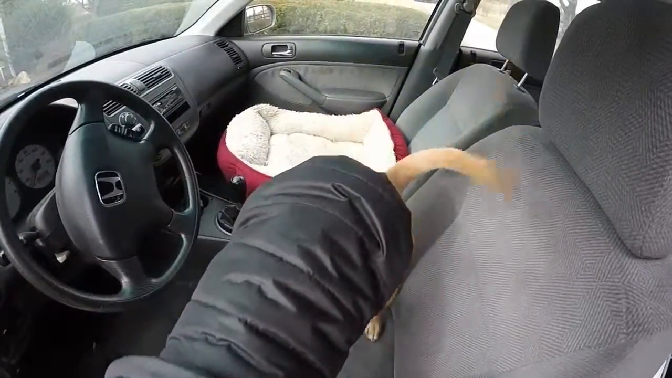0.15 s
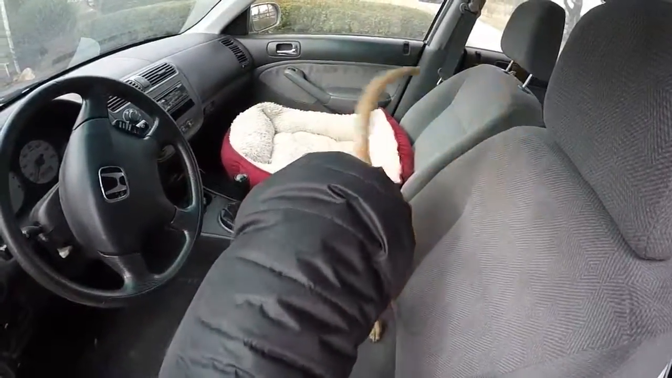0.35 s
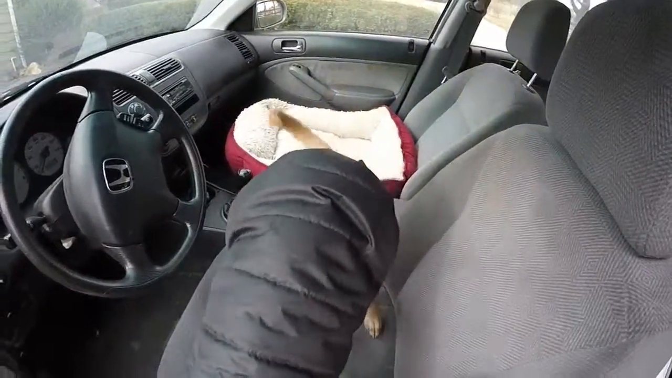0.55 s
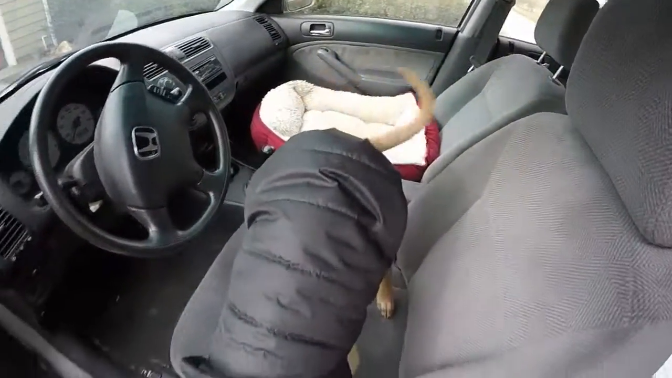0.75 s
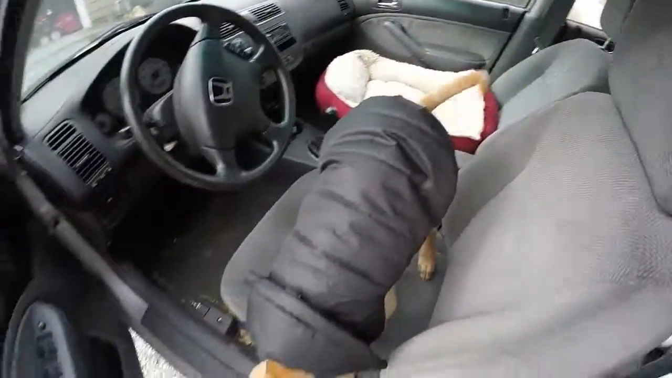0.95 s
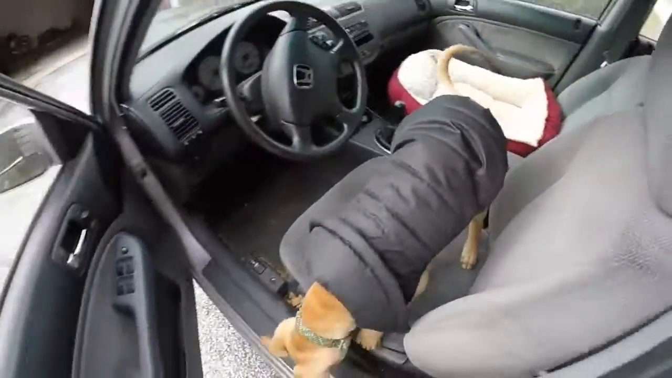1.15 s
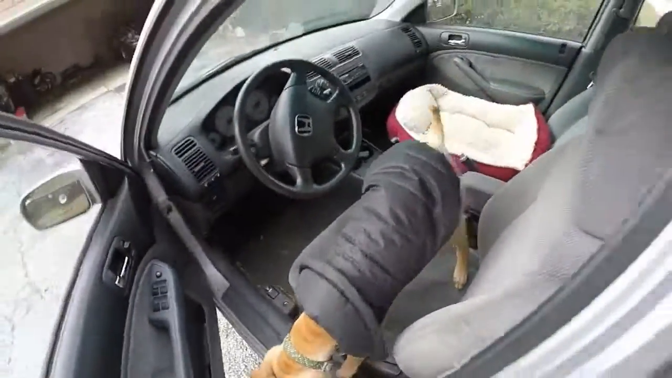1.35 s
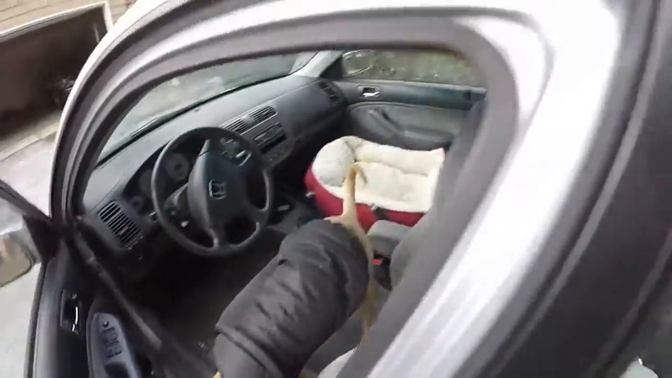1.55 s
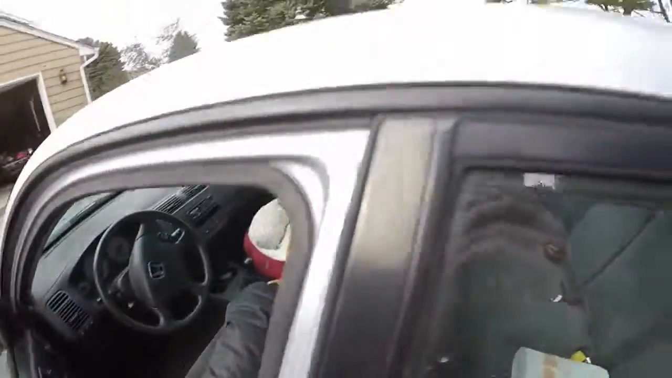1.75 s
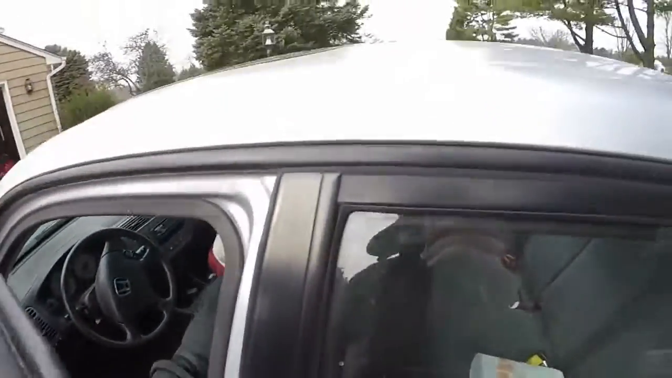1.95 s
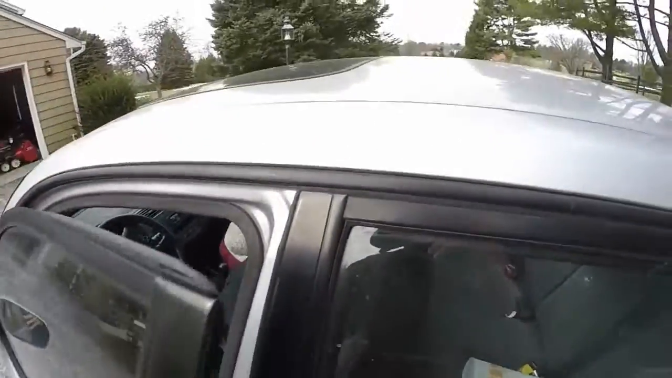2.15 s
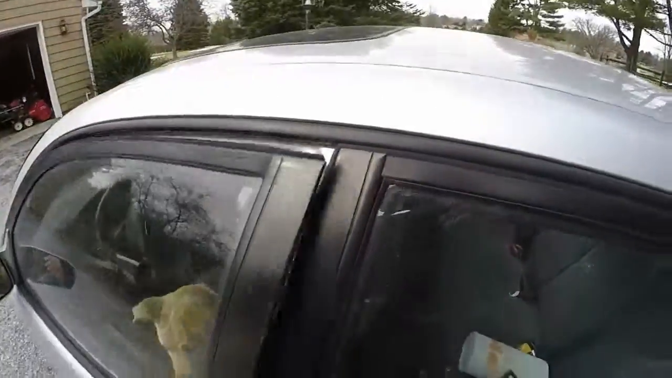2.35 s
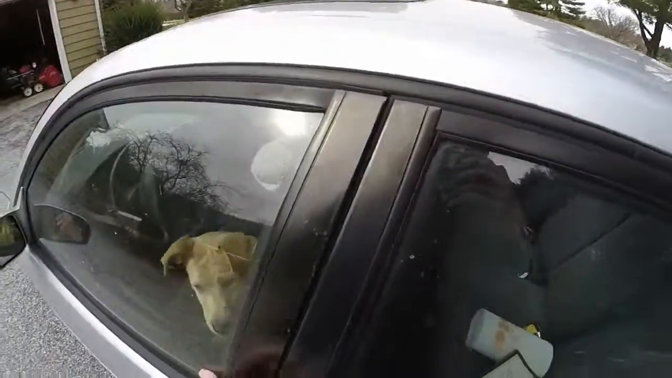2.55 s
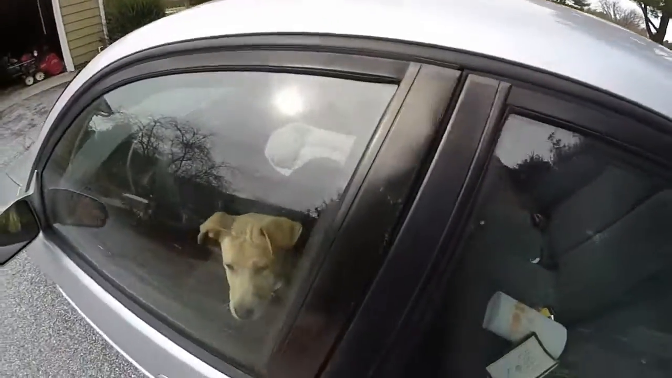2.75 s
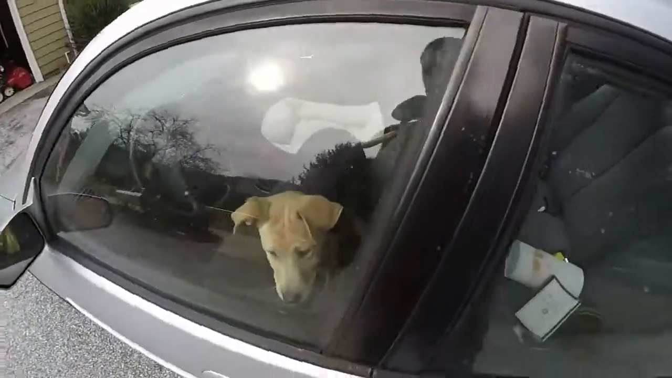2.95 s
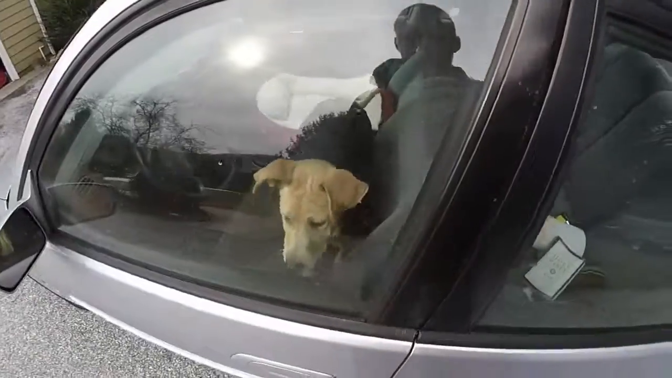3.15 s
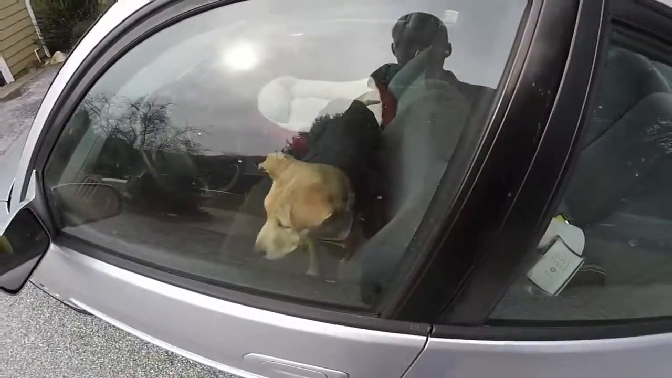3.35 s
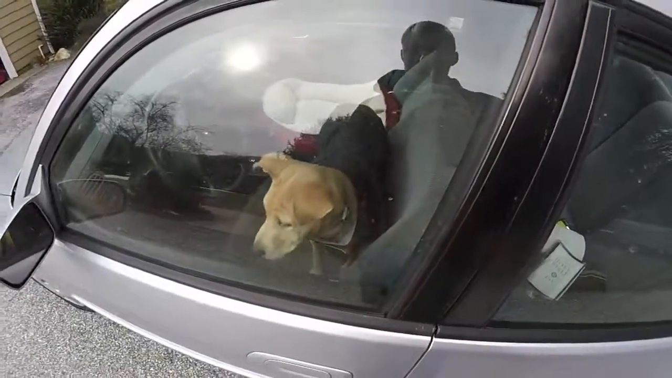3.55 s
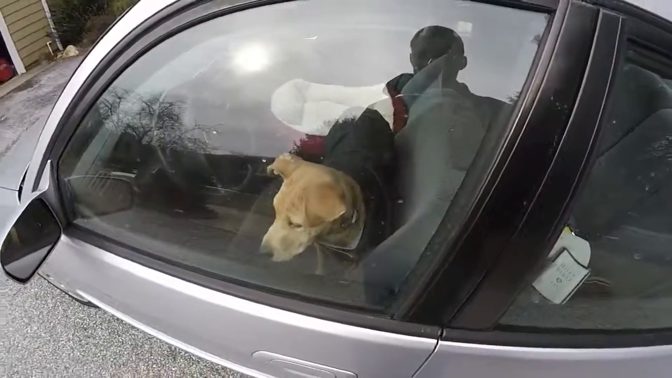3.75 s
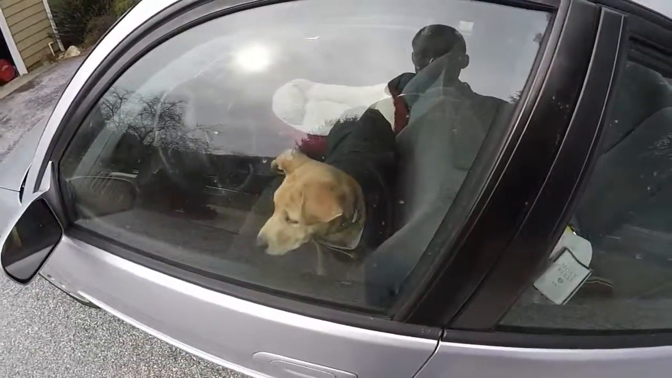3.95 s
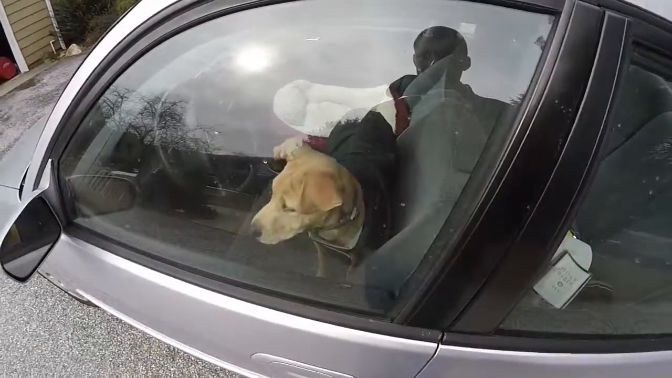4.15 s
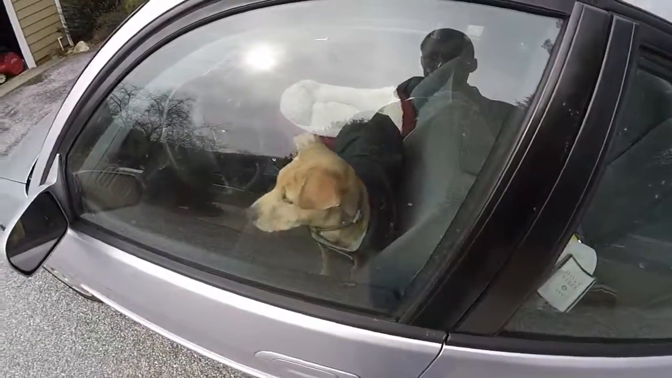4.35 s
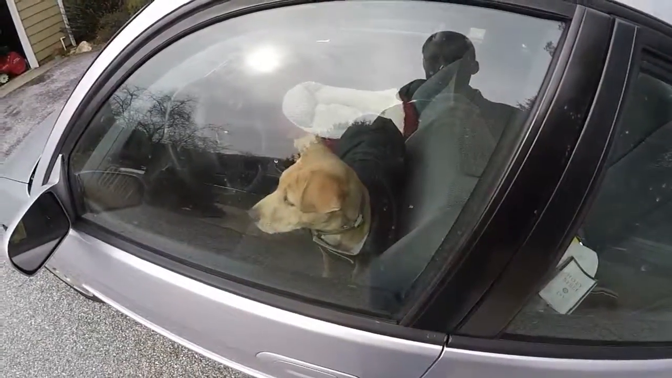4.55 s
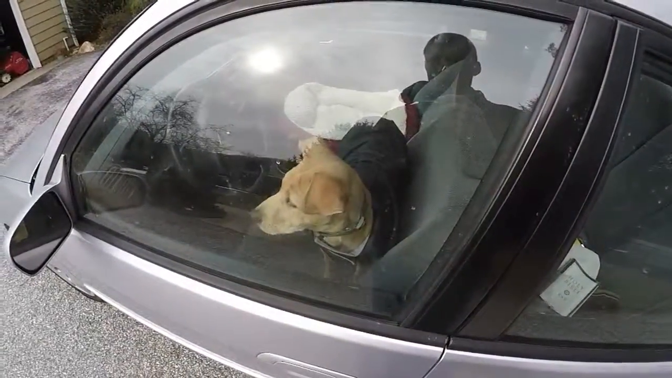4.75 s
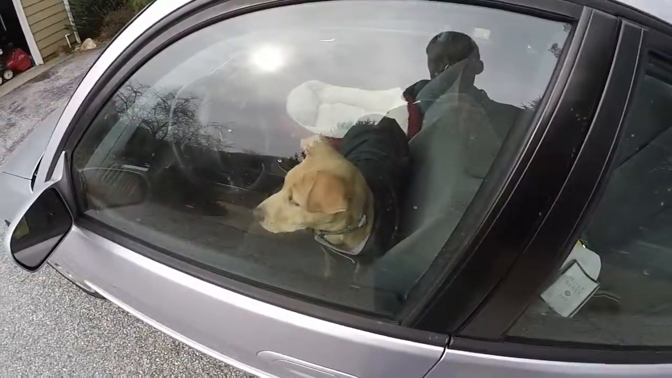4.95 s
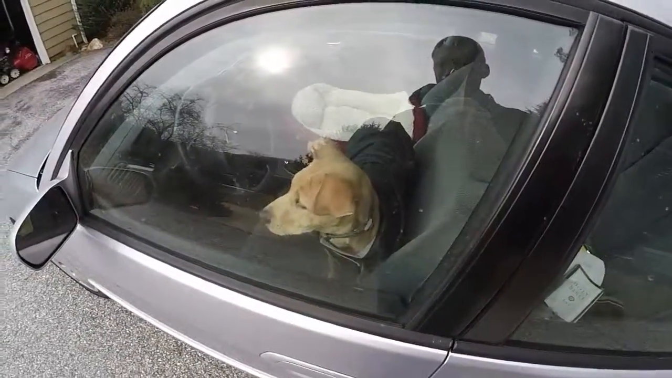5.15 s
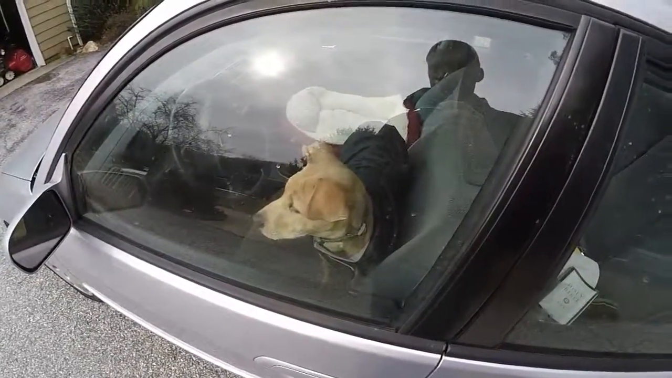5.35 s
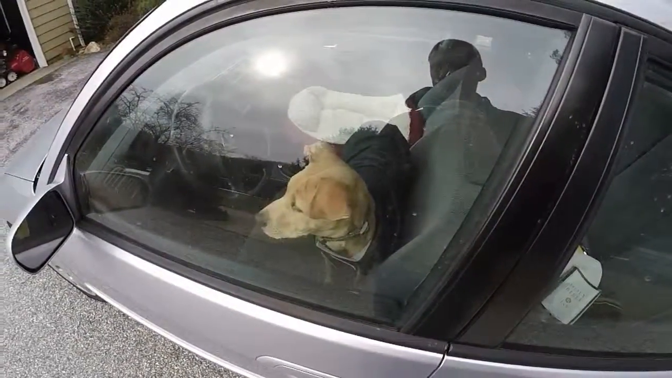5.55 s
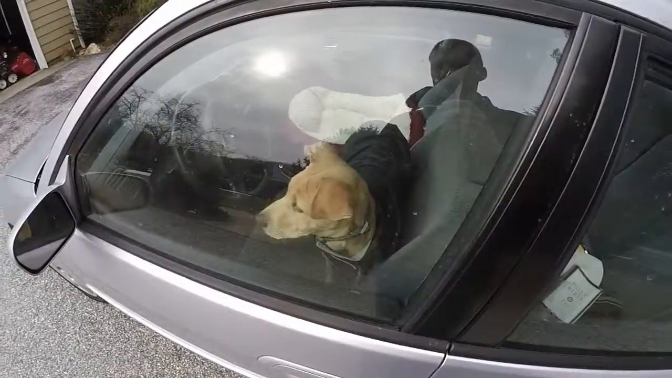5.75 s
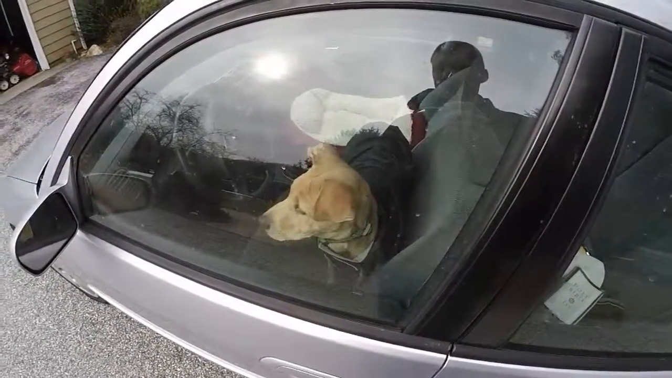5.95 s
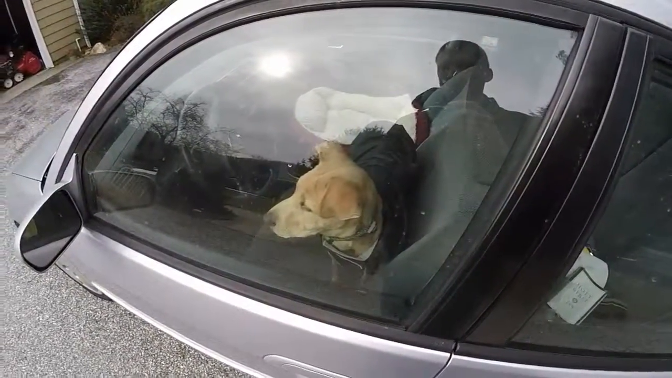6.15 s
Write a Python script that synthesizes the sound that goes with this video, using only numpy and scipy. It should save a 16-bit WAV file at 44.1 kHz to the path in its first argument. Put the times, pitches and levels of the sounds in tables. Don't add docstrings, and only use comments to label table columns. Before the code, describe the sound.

Soft scuffs, dull thuds and sharp plastic ticks come in uneven clusters from inside a parked car, over a faint low hum. The outside bass opens up as the microphone leaves the cabin. A faint squeaking hinge leads to one loud, heavy door thunk with rattling panel. A few small clicks and a knock follow, then a quiet driveway with far traffic and sparse high chirps.

```python
import sys
import numpy as np
from scipy import signal
from scipy.fft import rfft, irfft, next_fast_len
from scipy.io import wavfile
from scipy.ndimage import uniform_filter1d, map_coordinates

SR = 44100
rng = np.random.default_rng(int(sys.argv[2]) if len(sys.argv) > 2 else 0)


def rack_gain(trim_db):
    fader = np.asarray(trim_db, float)
    return 10 ** (fader / 20)


def master_out(mix):
    frames = np.transpose(np.atleast_2d(mix))
    ceiling = np.clip(frames, -1, 1)
    pcm = np.round(ceiling * 32767).astype(np.int16)
    wavfile.write(sys.argv[1], SR, pcm)


N = 273905


def unit(x):
    return x / np.sqrt(np.mean(x ** 2) + 1e-20)


def along(points, hz):
    f, v = np.transpose(points)
    return np.interp(np.log(hz + 1), np.log(f + 1), v)


def curves(rows):
    s, *columns = np.transpose(rows)
    return [np.interp(np.arange(N) / SR, s, column) for column in columns]


def wobble(rate, size=N):
    knots = rng.standard_normal(int(size * rate / SR) + 4)
    return map_coordinates(knots, [np.arange(size) * rate / SR])


def filtered(x, response):
    m = next_fast_len(len(x) + 8192)
    return irfft(rfft(x, m) * response(np.fft.rfftfreq(m, 1 / SR)), m)[:len(x)]


def peak(f, hz, width_hz):
    return 1j * f * width_hz / (hz * hz - f * f + 1j * f * width_hz + 1e-9)


def modes(table):
    return lambda f: sum((-1) ** k * rack_gain(db) * peak(f, hz, w) for k, (hz, w, db) in enumerate(table))


def noise_band(size, hz, width_hz, order=2):
    return unit(filtered(rng.standard_normal(size), lambda f: peak(f, hz, width_hz) ** order))


def coloured(spectrum, grain_db=0.0):
    fibres = rack_gain(grain_db * wobble(700) + .5 * grain_db * wobble(60))
    return unit(filtered(fibres * rng.standard_normal(N), lambda f: rack_gain(along(spectrum, f))))


def patchy(x, patch_db):
    z = signal.stft(x, nperseg=256)[2]
    field = uniform_filter1d(rng.standard_normal(z.shape), size=7, axis=0)
    field = uniform_filter1d(field, size=9, axis=1)
    return unit(signal.istft(z * rack_gain(patch_db * unit(field)), nperseg=256)[1][:N])


def swells(rows, rise_s, fall_s, slower=0.0):
    t = np.arange(0, N / SR, .001)
    start, hold, db = (column[:, None] for column in np.transpose(rows))
    lost = np.maximum(start - t, 0) / (rise_s + slower * hold)
    lost = lost + np.maximum(t - start - hold, 0) / (fall_s + slower * hold)
    return np.interp(np.arange(N) / SR, t, np.sqrt((rack_gain(db - 10 * lost) ** 2).sum(axis=0)))


def dying(t, t60, attack):
    return rack_gain(-60 * t / t60) * (1 - np.exp(-t / attack))


def add(track, s, sound):
    start = round(s * SR)
    track[start:start + len(sound)] += sound[:N - start]


def whistle(rows, partials, rough_db):
    s, hz, db = np.transpose(rows)
    t = np.arange(s[0], s[-1], 1 / SR)
    pitch = np.interp(t, s, hz) * (1 + 0.0033 * wobble(188.0, size=len(t)))
    turn = 2 * np.pi * np.cumsum(pitch) / SR
    edge = np.clip(np.minimum(t - s[0], s[-1] - t) / 0.0018, 0, 1)
    level = rack_gain(np.interp(t, s, db) + rough_db * wobble(147.0, size=len(t)))
    passed = (t - s[0]) / (s[-1] - s[0])
    tone = sum(rack_gain(g + fade * passed) * np.sin(k * turn) for k, g, fade in partials)
    return np.sqrt(2) * edge * level * tone


# frequency in Hz, level in dB per Hz.
TRAFFIC = [(32, -48), (55, 1), (123, -2.5), (145, -6.5), (232, -9.5), (267, -22.5), (323, -25.5),
           (409, -17.5), (556, -21.5), (792, -17.5), (1940, -28), (3340, -28), (6780, -35), (7460, -36.5),
           (15500, -42.5)]
# frequency in Hz, width in Hz, level in dB.
HUM = [
    (121, 7.1, -51),
    (237.5, 28, -61),
    (89, 10, -64.5),
    (2677, 98, -72.5),
    (4500, 840, -71),
]
# start in seconds, hold in seconds, level in dB.
GUSTS = [(.2, 0.49, -49), (1.13, 0.018, -41.5), (1.33, 0.028, -38), (1.62, 0.57, -48.5), (2.6, .06, -45),
         (2.8, 0.065, -43), (2.95, 0.37, -48), (4.25, 0.18, -56), (5.12, 0.055, -55), (5.6, 0.047, -50),
         (6.15, .1, -60)]


def outdoors():
    wash = rack_gain(-44.5 - 1.5 + 0.23 * wobble(3.46)) * coloured(TRAFFIC)
    hum = sum(rack_gain(db) * noise_band(N, hz, width_hz) for hz, width_hz, db in HUM)
    shelter_db, = curves([(1, -4.5), (1.2, 0.7)])
    bass = filtered(wash + hum, lambda f: 1 / (1 + (f / 1200) ** 2))
    buffet = coloured([(8, -120), (18, -3), (35, 16.5), (55, 6.5), (90, -7), (150, -120)])
    still_air = rack_gain(-52)
    puffs = np.hypot(still_air, swells(GUSTS, rise_s=0.11, fall_s=0.055))
    return wash + hum + (rack_gain(shelter_db) - 1) * bass + puffs * buffet


# time from the start in seconds, frequency in Hz, level in dB.
SEEP = [(0, 6300, -12), (.011, 7400, 0), (.02, 7380, 1), (.09, 7200, -16), (.17, 7250, -24)]
CHIP = [(0, 8140, -12), (.012, 7600, 1.5), (.027, 7250, -7)]
RISE = [(0, 2480, -9), (.006, 2630, -2), (.013, 2770, -2), (.018, 2940, -13), (.023, 3230, -2),
        (.031, 3350, -1), (.041, 3150, -6)]
COO = [(0, 1300, -5), (.025, 1230, 0), (.038, 1440, -3), (.05, 1630, 1), (.075, 1540, -4), (.125, 1420, -6)]
# share of its length, share of its top pitch, level in dB.
ARCH = [(0, .8, -2), (.3, .93, 1.5), (.57, 1, 2.5), (1, .86, -6)]
# start in seconds, level in dB.
SEEPS = [
    (3.752, -49.5),
]
CHIPS = [
    (3.951, -52),
    (4.982, -53.5),
]
RISES = [
    (5.27, -60),
    (5.553, -57.5),
    (5.981, -55),
]
COOS = [
    (4.513, -60),
    (4.922, -60),
]
# start in seconds, length in seconds, top frequency in Hz, level in dB.
ARCHES = [
    (4.729, .046, 4110, -60),
]


def birds():
    out = np.zeros(N)
    calls = [(SEEP, SEEPS), (CHIP, CHIPS), (RISE, RISES), (COO, COOS)]
    notes = [[(s + late, hz, db + g) for late, hz, g in shape] for shape, rows in calls for s, db in rows]
    notes += [[(s + u * length, k * hz, db + g) for u, k, g in ARCH] for s, length, hz, db in ARCHES]
    for note in notes:
        add(out, note[0][0], whistle(note, [(0.99, 0, 0)], rough_db=1.8))
    return out


# time in seconds, level in dB.
SHUFFLE = [(0, -55), (.9, -56), (1.04, -43), (1.35, -49.5), (1.97, -47), (2.13, -55), (2.54, -39),
           (2.73, -53.5), (3.2, -49.5), (3.61, -56), (6.21, -55.5)]
# frequency in Hz, level in dB per Hz.
DULL = [(250, -120), (500, -2), (1000, 2), (2000, 0), (3200, -6), (5000, -15), (8000, -120)]
CRISP = [(2000, -120), (3200, -2), (4500, -1), (6500, -4), (9000, -8), (11000, -11.5), (13000, -14.5),
         (16000, -14)]
# start in seconds, hold in seconds, level in dB, crispness in dB.
RUBS = [(0, 0.0081, -49.5, -6), (0.133, 0.022, -49.5, -3), (0.208, 0.04, -59.5, -1), (0.356, 0.019, -49, 0),
        (.43, .07, -55.5, -3.5), (0.521, 0.025, -52.5, 1.5), (0.681, 0.018, -53.5, -3.5),
        (0.779, 0.12, -52, -6), (0.895, 0.037, -48.5, -7.5), (0.961, 0.051, -42, -8),
        (1.03, 0.042, -41.5, -11.5), (1.144, 0.045, -45, -5), (1.255, .02, -44.5, -5.5),
        (1.357, 0.018, -48.5, -2), (1.386, 0.038, -45, 4), (1.522, 0.022, -34.5, -4.5),
        (1.563, 0.01, -49.5, 4.5), (1.64, 0.031, -46, -8), (1.786, 0.041, -44, -17),
        (1.818, 0.038, -46.5, -7), (1.916, 0.26, -54, -6), (2.275, 0.22, -52, -3), (2.52, 0.055, -43, -19),
        (2.848, 0.15, -56.5, -8), (3.068, 0.052, -51, -11.5), (3.407, 0.26, -60.5, -6)]


def cloth():
    def stroke(rows):
        return swells(rows, rise_s=0.026, fall_s=0.028, slower=0.33)

    dull_level = stroke([(s, hold, db) for s, hold, db, _ in RUBS])
    crisp_level = stroke([(s, hold, db + crisp_db) for s, hold, db, crisp_db in RUBS])
    dull = dull_level * patchy(coloured(DULL, grain_db=3), patch_db=1.3)
    crisp = crisp_level * patchy(coloured(CRISP, grain_db=1.5), patch_db=1.8)
    weight_db, = curves(SHUFFLE)
    rumble = [(70, -120), (140, 6.5), (250, 5.5), (450, -1), (700, -3.0), (1200, -120)]
    return dull + crisp + rack_gain(weight_db) * coloured(rumble, grain_db=1)


# start in seconds, end in seconds, level in dB, frequency in Hz, width in Hz.
STROKES = [(0.32, 0.62, -58, 8400, 2000), (.96, 1.015, -39, 2750, 1200), (0.47, 0.596, -54, 1900, 1500),
           (1.51, 1.57, -37.5, 3340, 1400), (1.1, 1.9, -44.5, 303, 260), (2.1, 2.45, -56.5, 1000, 1600),
           (2.29, 2.36, -58, 8100, 800), (2.295, 2, -60, 6700, 700), (2.822, 2.849, -59, 8500, 10000),
           (2.883, 2.9, -45.5, 3500, 2600), (1.34, 1.42, -48, 2700, 1800), (1.8225, 1.827, -41, 7800, 9900),
           (1.94, 1.957, -50, 3300, 1300), (1.545, 1.575, -40, 520, 370), (2.91, 2.925, -43, 240, 250),
           (1.84, 1.917, -39, 280, 170), (3.6, 3.92, -59.5, 2600, 3000), (5.8, 6.02, -51.5, 290, 370),
           (2.4395, 2.4435, -48, 9500, 6000), (2.458, 2.468, -42, 10500, 5000),
           (2.476, 2.492, -44, 10000, 8000), (2.49, 2.535, -52, 13000, 8000),
           (2.6088, 2.6115, -56, 8500, 5000), (2.6295, 2.6318, -54, 9000, 6000),
           (2.6415, 2.644, -54, 8000, 5000), (3.4185, 3.4235, -56, 8000, 3000),
           (2.854, 2.866, -47, 1100, 500), (2.232, 2.246, -55, 3500, 700), (3.06, 3.11, -57, 4900, 3200),
           (2.884, 2.902, -42, 350, 350), (1.749, 1.756, -37, 4950, 700), (2.54, 2.565, -45, 3800, 1500),
           (3.12, 3.33, -56, 1700, 3000), (2.611, 2.629, -51, 3600, 5000), (1.749, 1.756, -38, 4050, 600),
           (0.975, 0.995, -45, 3200, 600), (3.55, 4.37, -61, 700, 400)]


def strokes():
    out = np.zeros(N)
    for start, end, db, hz, width_hz in STROKES:
        swell = np.hanning(round((end - start) * SR))
        add(out, start, rack_gain(db) * swell * noise_band(len(swell), hz, width_hz))
    return out


# time in seconds, peak in dB, frequency in Hz, sign of the push.
JOLTS = [(0.164, -27.5, 34, 1), (0.301, -37, 24, 1), (0.503, -37, 39, 1), (.74, -36.5, 43, 1),
         (1.308, -25, 42.6, -1), (1.594, -30, 42, 1), (2.02, -33.5, 45, 1), (2.266, -37, 61, 1),
         (2.827, -25, 70, -1), (3.1, -32, 40, 1), (2.876, -30.5, 78, -1), (2.485, -20, 125, -1),
         (2.4945, -13, 113, -1), (1.219, -29, 200, 1), (1.275, -30, 140, 1), (1.99, -30.5, 220, 1),
         (1.575, -31.5, 204, 1), (2.553, -15.5, 65, 1), (2.537, -14.5, 38, -1), (2.609, -24, 39, 1),
         (2.652, -33, 38, 1), (2.667, -27.5, 65, -1), (2.718, -34, 53, -1), (2.787, -35, 50, -1),
         (1.84, -33.5, 80, -1), (2.49, -24, 19, 1)]


def jolts():
    out, t = np.zeros(N), np.arange(SR // 5) / SR
    for s, db, hz, sign in JOLTS:
        turn = hz * (t - .1)
        add(out, s - .1, sign * rack_gain(db) * np.exp(-2 * turn ** 2) * np.cos(2 * np.pi * turn))
    return out


# start in seconds, peak in dB, ring frequency in Hz, t60 in seconds.
THUDS = [(.110, -27, 400, 0.026), (.117, -24.5, 530, 0.022), (.121, -25.5, 157, 0.041),
         (.128, -42.5, 257, 0.14), (.42, -39.5, 348, 0.038), (3.27, -40, 380, 0.078),
         (.516, -31, 122, 0.034), (.674, -36, 133, 0.15), (2.228, -30.5, 160, 0.057),
         (1.240, -24, 184, .029), (1.2474, -15, 161, 0.041), (1.2637, -21, 151, 0.049),
         (1.27, -21, 126, 0.041), (1.284, -30, 112, 0.08), (1.347, -25.5, 263, 0.053),
         (1.367, -18, 204, 0.019), (1.382, -31.5, 111, 0.14), (1.420, -27.5, 254, 0.055),
         (1.485, -36, 457, 0.079), (1.636, -35, 476, 0.089), (1.752, -20.5, 427, 0.053),
         (1.7573, -24, 259, 0.074), (1.823, -25, 340, 0.027), (1.986, -38, 517, .022),
         (2.152, -37, 414, .043), (2.219, -37, 288, 0.047), (2.8695, -28.5, 333, 0.025),
         (3.412, -30, 310, 0.057), (3.4493, -17.5, 326, 0.02), (.5, -36, 190, .08),
         (.53, -40.5, 300, 0.068), (2.8645, -32, 200, 0.044), (3.25, -39, 300, 0.055)]


def thuds():
    out, t = np.zeros(N), np.arange(SR // 5) / SR
    for s, db, hz, t60 in THUDS:
        padding = noise_band(len(t), 1.14 * hz, 1.4 * hz)
        decay = dying(t, t60, 0.33 / hz)
        add(out, s, rack_gain(db + 3) * decay * (0.36 * padding - np.sin(2 * np.pi * hz * t)))
    return out


# start in seconds, peak in dB, body in Hz, t60 in seconds, sizzle in Hz.
TICKS = [(.130, -25.5, 1920, 0.019, 4830), (.829, -20, 1490, 0.073, 4300), (1.022, -28, 1010, .049, 5770),
         (1.317, -31.5, 1900, 0.059, 2900), (1.343, -23.5, 790, 0.068, 4550),
         (1.42, -19.5, 913, 0.095, 2800), (1.594, -24, 1570, 0.041, 5900), (1.634, -39, 970, .05, 5000),
         (1.750, -21.5, 1010, 0.038, 4600), (1.7504, -18, 2200, 0.023, 4700),
         (1.8235, -18, 690, 0.044, 4500), (2.609, -31, 2500, .015, 4500), (2.6295, -32, 2420, .014, 4760),
         (2.642, -32, 1500, 0.02, 4500), (2.679, -38, 2510, .03, 4040), (2.886, -42, 3000, 0.036, 4950)]
# start in seconds, peak in dB, body in Hz, t60 in seconds.
TAPS = [(.110, -27, 730, 0.028), (0.302, -37, 1390, 0.026), (.671, -40, 1040, 0.066),
        (1.062, -33, 900, 0.067), (1.243, -30, 850, .04), (1.747, -29, 2000, 0.063),
        (1.816, -26.5, 1700, 0.089), (1.949, -42, 3400, .04), (1.99, -30.5, 790, 0.031),
        (2.152, -35.5, 1400, 0.07), (2.156, -34.5, 699, 0.06), (2.220, -32.5, 1100, 0.044),
        (2.869, -34, 650, 0.024), (3.409, -44, 1500, .03), (3.420, -36.5, 1830, 0.024),
        (3.448, -29.5, 650, 0.015), (2.347, -37, 1250, .02), (2.4383, -32, 1700, .04)]


def ticks():
    out, t = np.zeros(N), np.arange(SR // 5) / SR
    hard = [row + (-3,) for row in TICKS]
    padded = [row + (2000, -10) for row in TAPS]
    for s, db, hz, t60, sizzle_hz, sizzle_db in hard + padded:
        blow, scrape = rng.standard_normal((2, len(t))) * dying(t, t60, 0.000078)
        blow[0], scrape[0] = -7, 4
        body = unit(filtered(blow, lambda f: peak(f, hz, 1.2 * hz) ** 2))
        sizzle = unit(filtered(scrape, lambda f: peak(f, sizzle_hz, 0.97 * sizzle_hz) ** 3))
        ring = unit(dying(t, 0.4 * t60, 0.000093) * np.sin(2 * np.pi * hz * t))
        tick = body - rack_gain(-1.5) * ring + rack_gain(sizzle_db) * sizzle
        add(out, s, rack_gain(db) * tick / np.abs(tick).max())
    return out


# time in seconds, frequency in Hz, level in dB.
HINGE = [
    (1.84, 2660, -58),
    (1.852, 2665, -51.5),
    (1.924, 2627, -46),
    (1.932, 2600, -47),
    (1.987, 2574, -48.5),
    (2.0, 2500, -53.5),
    (2.064, 2410, -47.5),
    (2.114, 2320, -51.5),
    (2.168, 2370, -66),
]
# time in seconds, frequency in Hz, level in dB.
HINGE_END = [
    (2.135, 2440, -64),
    (2.15, 2600, -66),
    (2.17, 2640, -60),
    (2.19, 2580, -62),
    (2.205, 2520, -63),
    (2.222, 2400, -69),
]
# multiple of the slip rate, level in dB, change in dB as the slip slows.
HINGE_PARTIALS = [(1, -9.5, 1), (2, 3, 1), (3, -12.5, -6), (4, -18, -4)]


def hinge():
    out = np.zeros(N)
    partials = [(k / 2, g, fade) for k, g, fade in HINGE_PARTIALS]
    for slip in HINGE, HINGE_END:
        add(out, slip[0][0], whistle(slip, partials, rough_db=2.0))
    plate = modes([(3800, 260, 1)])
    return filtered(out, lambda f: 1 + plate(f))


# start in seconds, latch in dB, panel in dB, rattle t60 in seconds,
# bright scrape in dB.
SLAM = [(2.438, -28, -17, 0.12, -12), (2.449, -30, -8.5, 0.099, -2), (2.461, -26, -6.5, 0.13, 9),
        (2.468, -8, -3, 0.045, -7), (2.475, -13, -8, 0.041, -6), (2.488, -18, 0.5, 0.049, -7),
        (2.493, -20, -13, 0.06, 6), (2.502, -20, -11.5, 0.089, -14), (2.520, -27, -3.5, 0.065, -1),
        (2.548, -38, -20, 0.11, -3), (2.5695, -38.5, -19, 0.047, 6.5)]
# frequency in Hz, width in Hz, level in dB.
LATCH = [(910, 120, 2.5), (1240, 267, 2), (1570, 460, -2.5), (2200, 820, -7)]
# frequency in Hz, width in Hz, level in dB.
SEAL = [(2800, 1500, -3.5), (4700, 1360, 0), (7160, 2000, -9)]
# frequency in Hz, level in dB, t60 in seconds.
PANEL = [(117, -19, 0.4), (165, -18, 0.22), (220, -3, 0.096), (251, -15, 0.079), (297, -1, 0.09),
         (372, -1.5, 0.12), (451.4, -9, 0.13), (530, -13, 0.086), (589, -8, 0.055), (725, -6, 0.048),
         (969, -10.5, 0.05)]
# start in seconds, peak in dB, frequency in Hz, t60 in seconds.
RINGS = [(2.488, -23, 108, 0.09), (2.5213, -7, 257, 0.05), (2.5496, -19.5, 229, 0.099),
         (2.573, -22.5, 206, 0.087), (2.615, -28, 170, 0.092), (2.648, -31.5, 142, 0.12),
         (2.60, -34.5, 366, 0.12), (2.478, -16, 590, 0.052), (2.522, -24, 570, 0.043),
         (2.62, -39.5, 880, 0.091), (2.4686, -5.5, 1230, 0.033), (2.4753, -10, 1150, 0.016),
         (2.4808, -11, 235, 0.053), (2.4895, -12, 320, 0.022), (2.503, -14, 320, .025),
         (2.4695, -16.5, 1580, 0.037), (2.4915, -17.5, 1450, 0.038), (2.5697, -32, 4100, .012),
         (2.6296, -37, 5100, 0.011), (2.4385, -27, 1740, .025), (2.559, -19, 250, .05),
         (2.4845, -14, 514, .04), (2.465, -18, 526, .04), (2.534, -19.5, 220, .08)]
# start in seconds, level in dB, sign.
PUMP = [
    (2.456, -14.5, 1),
    (2.503, -19, 1),
    (2.518, -9.5, 1),
    (2.545, -22, 1),
]
CABIN_HZ, CABIN_T60_S = 34.5, 0.13


def door():
    out, t = np.zeros(N), np.arange(SR // 2) / SR
    for s, latch_db, panel_db, t60, bright_db in SLAM:
        jar, scrape = rng.standard_normal((2, len(t))) * dying(t, t60, 0.0012)
        rattle = filtered(jar, modes(LATCH))
        bright = rack_gain(bright_db - 7.5) * filtered(scrape, modes(SEAL))
        rattle = (rattle + bright) / np.abs(rattle).max()
        skin = np.zeros(len(t))
        for hz, db, ring_t60 in PANEL:
            level = rack_gain(db + rng.normal(0, 2))
            bent_hz = hz * rng.normal(1, .025)
            skin += level * dying(t, ring_t60, 0.0021) * np.sin(2 * np.pi * bent_hz * t)
        add(out, s, rack_gain(latch_db) * rattle + rack_gain(panel_db - 9.0) * skin)
    for s, db, hz, t60 in RINGS:
        add(out, s, rack_gain(db) * dying(t, t60, 0.00054) * np.sin(2 * np.pi * hz * t))
    boom = dying(t, CABIN_T60_S, 0.005) * np.sin(2 * np.pi * CABIN_HZ * t)
    for s, db, sign in PUMP:
        add(out, s, sign * rack_gain(db) * boom)
    return out


# frequency in Hz, t60 in seconds.
YARD = [(200, 0.65), (2000, 0.32), (10000, 0.36)]


def yard(x):
    hz, t, z = signal.stft(rng.standard_normal(SR // 2), SR, nperseg=256)
    tail = signal.istft(z * rack_gain(-60 * t / along(YARD, hz)[:, None]), SR, nperseg=256)[1]
    late = np.pad(x, (300, 0))
    return signal.fftconvolve(late, tail / np.linalg.norm(tail))[:N]


def scene():
    background = outdoors() + cloth() + strokes()
    small = birds() + jolts() + thuds() + ticks() + hinge()
    slam = door()
    echoes = yard(rack_gain(-18.5) * slam + rack_gain(-16.0) * small)
    return (background + small + slam + echoes)[None]


def roll_off(x):
    return signal.sosfilt(signal.butter(12, 15330, fs=SR, output="sos"), x)


def record(dry):
    held = dry[0] / (1 + np.abs(dry[0] / .8) ** 4) ** (1 / 4)
    mix = filtered(held, lambda f: np.where(f < 15330, 1, rack_gain(-50)))[None]
    return roll_off(mix)


dry = scene()
out = record(dry)
master_out(out)
```